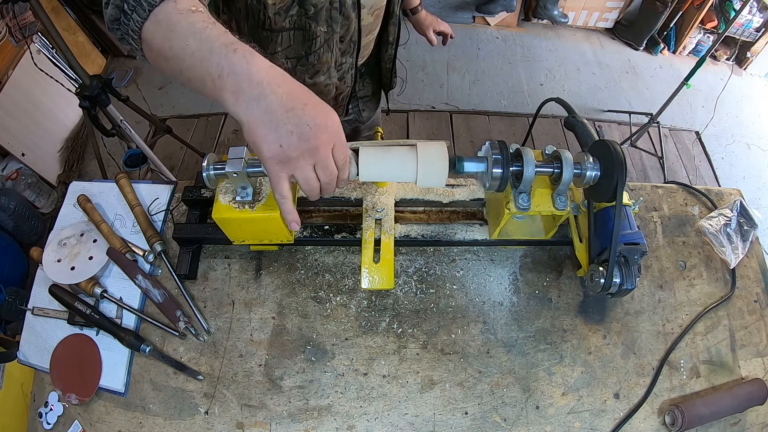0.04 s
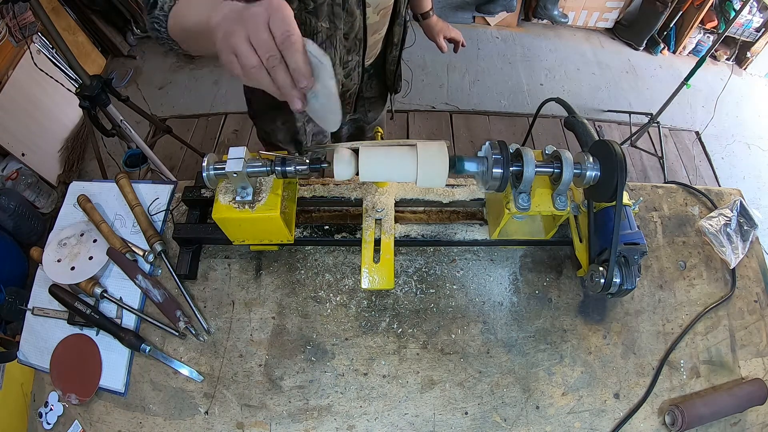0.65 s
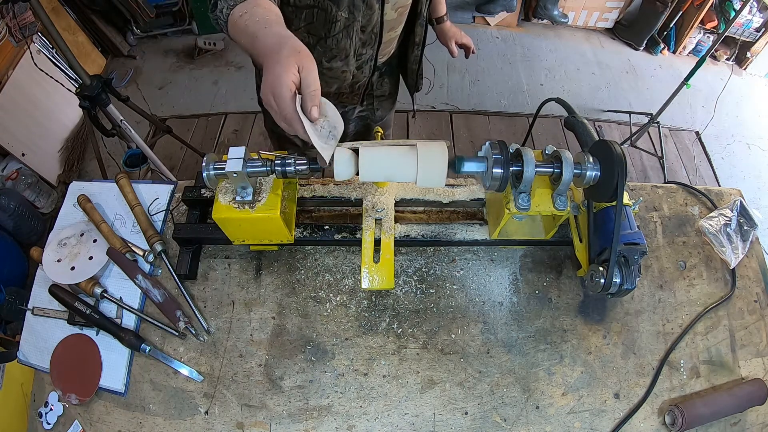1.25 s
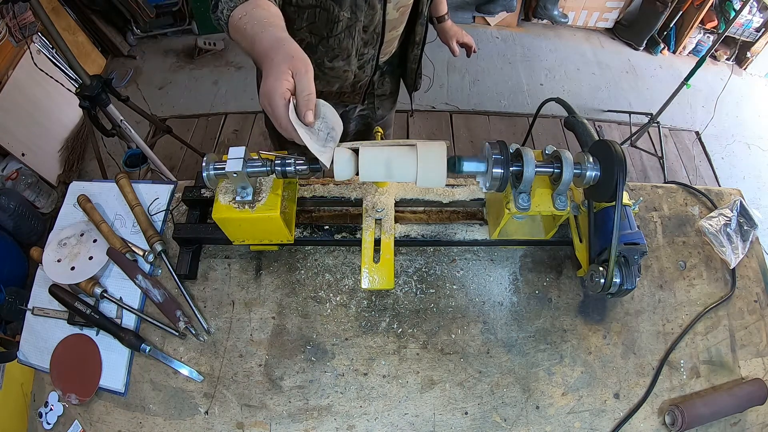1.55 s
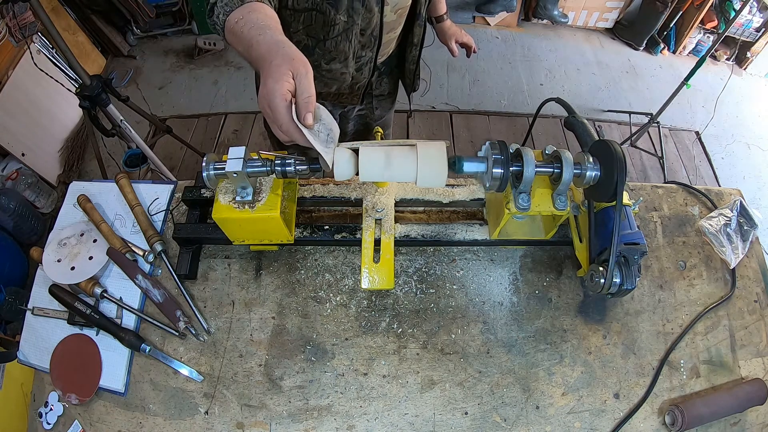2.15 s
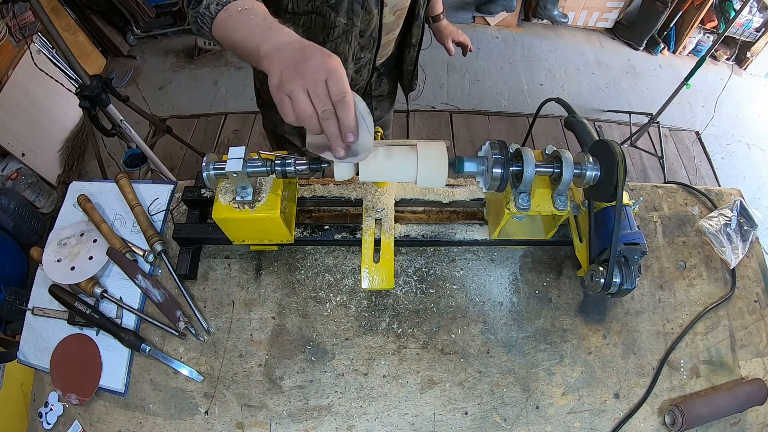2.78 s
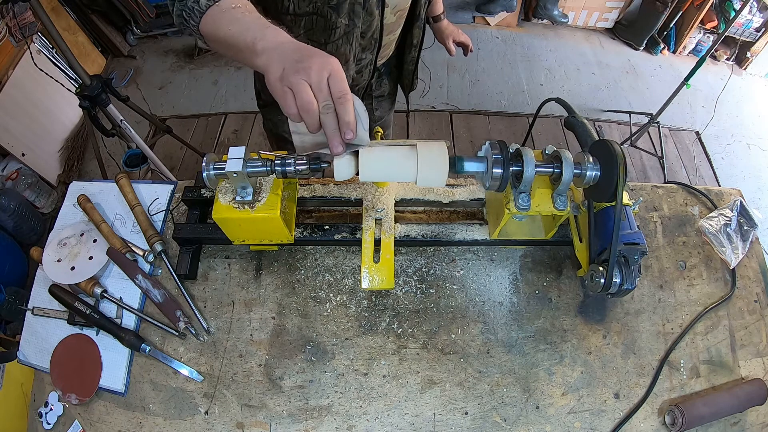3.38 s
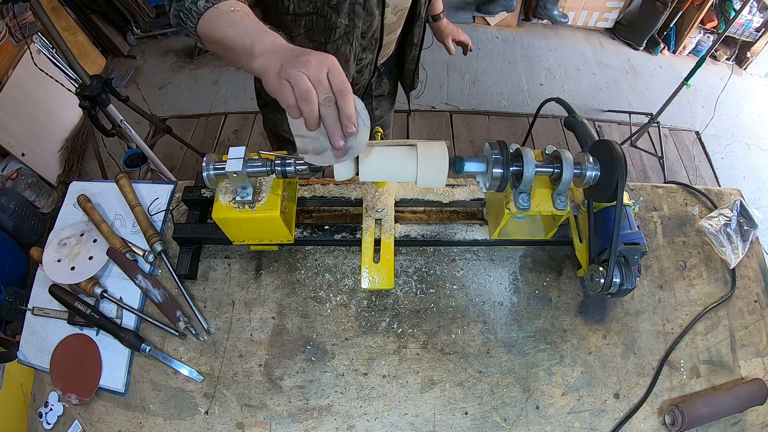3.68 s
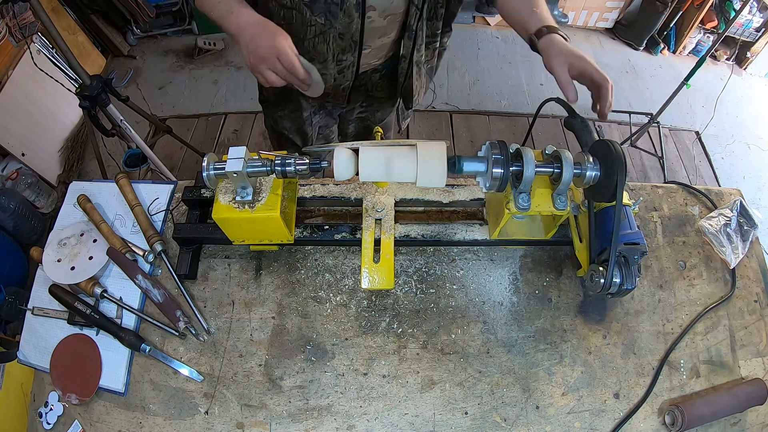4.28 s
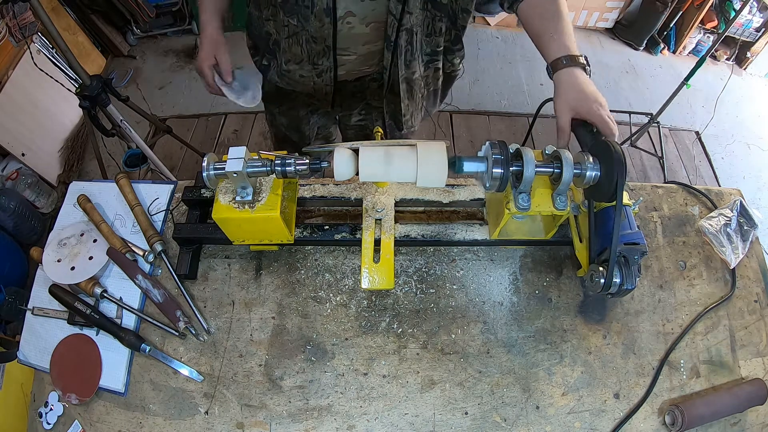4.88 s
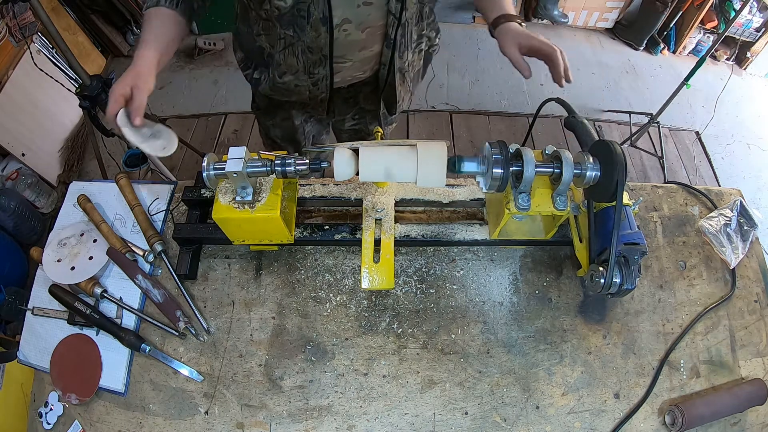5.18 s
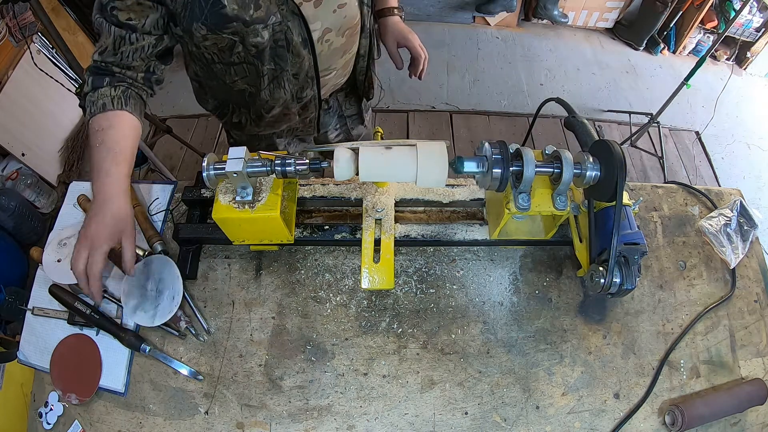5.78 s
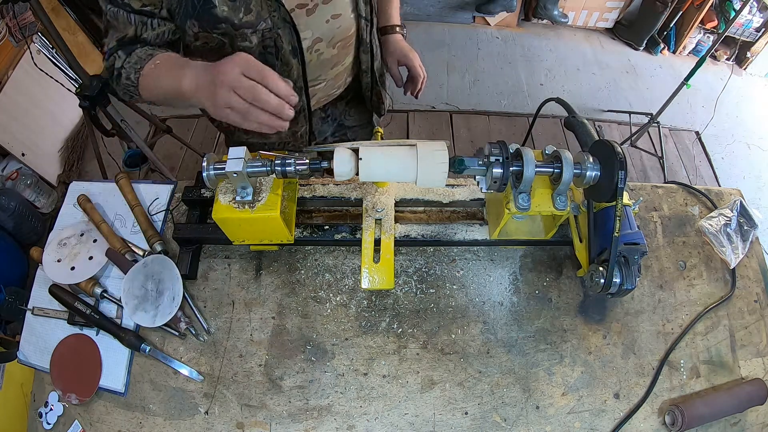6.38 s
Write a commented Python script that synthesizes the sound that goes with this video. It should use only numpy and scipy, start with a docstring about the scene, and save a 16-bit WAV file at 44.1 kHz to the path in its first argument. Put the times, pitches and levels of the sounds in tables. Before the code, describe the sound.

A small belt-driven wood lathe runs in a garage workshop, heard from close by. A sanding disc rubs the spinning wood with a dry, rapidly pulsing hiss and a high metallic ring over a low motor hum. After nearly five seconds the power cuts: the hum ends, the tones slide down and the hiss fades as the spindle slows. One soft knock on the bench follows the stop.

```python
"""A small belt-driven wood lathe runs on a garage workbench, a sanding disc held at the spinning piece.
Dry rubbing and rolling hiss and ring the spindle steel in pulses tied to the rotation; the bed drones
and the motor hums. The power is switched off: the hum ends, the tones slide down and the hiss fades
as friction brakes the spindle. A low rumble comes up, and just after standstill there is one soft
knock on the bench."""
import sys
import numpy as np
from scipy import signal
from scipy.fft import rfft, irfft, next_fast_len
from scipy.io import wavfile
from scipy.ndimage import uniform_filter1d

SR = 44100
rng = np.random.default_rng(int(sys.argv[2]) if len(sys.argv) > 2 else 0)


def put_to_file(sound):
    """Save the sound as 16-bit audio at rate SR, in the file named by the first command-line argument."""
    columns = np.atleast_2d(sound).T  # one column per channel
    safe = np.clip(columns, -1, 1)
    whole_steps = np.round(safe * 32767)
    wavfile.write(sys.argv[1], SR, whole_steps.astype(np.int16))


N = 288414
TIME = np.arange(N) / SR
TURN_HZ, HUM_HZ, POWER_OFF_S = 18.22, 100, 4.78

# drive under power: (time [s], speed [share of full speed])
DRIVEN_SPEED = [(0, .984), (.45, .984), (.8, 1.0), (1.4, 1.005), (2.3, .977), (3.3, 1.001), (4.2, 1.002),
                (4.4, 1.009)]
# spindle play, seated while the disc presses on the piece: (time [s], slack [0 seated, 1 loose])
SPINDLE_SLACK = [(0, 0.51), (.45, 0.27), (.65, 0.78), (.95, .03), (4.05, 0.045), (4.45, 1)]
# rough spots: (frequency [multiple of turn rate], relative depth when fast [dB], when slow [dB])
ROUGH_SPOTS = [(1, 1.1, .3), (2, 1.4, .9), (3.71, 2.0, 2.4), (7.42, .1, 3.1), (8, 1.5, .3)]
# modes of the spindle steel (two groups), the lathe bed and the bearing housings:
# (frequency [Hz], bandwidth [Hz], relative level [dB], change when loose [dB], change when slow [dB])
STEEL_LOW_MODES = [(4077, 100, -15.5, -9.5, 18), (4442, 160, -6, -1, -11), (4463, 100, -21, 13.5, -6),
                   (4664, 60, -6, 2.5, 3), (4710, 23, 0.5, -4, -10), (4948, 138, -3.5, -2.5, -2),
                   (5130, 40, -23.5, 11, 13), (5290, 160, -16, 1, 9), (5500, 57, -0.5, 2.5, -16),
                   (5696, 65, -0.5, -8, 10), (5880, 101, 0.5, -2, 6), (5946, 30, 6, -0.5, 2)]
STEEL_HIGH_MODES = [(6100, 56, 5, 9.5, -1), (6310, 140, 3, 16.5, 1.5), (6363, 110, 9, -30, 4),
                    (6475, 74, 12.5, 9.5, -15), (6706, 140, 0.5, 22, -4), (6540, 80, -33, 9.5, -0.5),
                    (7030, 290, -0.5, 13, -5), (6840, 60, -38.5, -12, -2)]
BED_MODES = [(224.3, 14.5, -11, -1.5, 0.5), (241.6, 4.7, -3, -5, -9.5), (282.7, 9.5, -0.5, -2, -1.5),
             (309.4, 16.3, -2, 0.5, -1.5), (329.6, 23, -9.5, 5.5, -1), (342.3, 16, -1.5, -2.5, -5.5),
             (365.2, 14.7, -10, 1, 4), (478.7, 8.2, -7, 0.5, -2.5), (508.2, 12.5, -7.5, -3.5, 5)]
HOUSING_MODES = [(604, 23, -8, 6.5, -2.5), (739, 56, -16.5, 4, 7.5), (926, 33.6, -1, -5, 1),
                 (988, 16, -6, 8, -7.5), (1256, 150, -9, 2, 1), (1568, 120, -5, -2, 4),
                 (1820, 55, -7.5, -9, 23), (1854, 24, 6.5, -3.5, -4), (1997, 89, 1, 0, 0.5),
                 (2460, 130, -2.5, 2.5, -4), (2673, 22, 3.5, 2.5, -10), (2870, 44, 0.5, -4, 5),
                 (3144, 230, -6, -10.5, 3.5), (3460, 147, 0, 2.5, -13), (4040, 290, -13, 9.5, -9)]
# gain of each part:
# (seated gain [dB], change when loose [dB], knee [share of full speed], fade [dB per tenfold slowing])
HISS_GAIN = (-32, 1.24, 0.64, 25)
STEEL_LOW_GAIN = (-22, -5, 0.77, 22)
STEEL_HIGH_GAIN = (-27.5, 0.44, .5, 22)
BED_GAIN = (-44.5, 2, 0.48, 16.5)
HOUSING_GAIN = (-42, 1, 0.15, 21.5)
# spectra of the friction hiss and the still workshop: (frequency [Hz], relative spectral level [dB])
HISS_SPECTRUM = [(60, -18), (150, -13), (400, -9), (800, -8), (2000, -7), (3200, -2), (4500, 2), (7000, 4),
                 (8400, 1.5), (9400, -3), (10300, -11), (11600, -16), (13000, -22), (16000, -26)]
AIR_SPECTRUM = [(15, -30), (25, -28.5), (70, 0.5), (97, -9), (161, -16.5), (545, -22.5), (624, -20),
                (2110, -36), (5280, -26), (16000, -39)]
# bearing whirr: (frequency [multiple of turn rate], half-width [Hz], level when loose and fast [dB])
WHIRR_BANDS = [(130, 130, -50), (144, 16, -52), (462, 300, -48), (632, 300, -59)]
# unbalance and belt tones: (frequency [multiple of turn rate], relative level [dB])
DRIVE_HARMONICS = [(4, -51), (5, -56), (6, -61), (7, -61), (8, -51), (16, -54)]
# bench-top resonances that the drive shakes: (frequency [Hz], bandwidth per pass [Hz], gain [dB])
BENCH_TOP_MODES = [(110, 30, 0), (287, 20, 4)]
# motor whine: (frequency [multiple of turn rate], seated level [dB], change when loose [dB])
WHINE_PARTIALS = [(144, -54, 6), (288, -45, -1)]
# blow on the bench: (time [s], relative level [dB])
BLOWS = [(6.398, -45)]
# modes of the struck bench: (frequency [Hz], relative level [dB], 60 dB decay time [s])
STRUCK_BENCH_MODES = [(125, 1.5, 0.072), (216, 3, 0.073), (352, -6, 0.065), (530, -18, .06),
                      (900, -16, .05), (1495, -22, .04)]


def from_db(db):
    """Amplitude ratio of a level in decibels."""
    return 10 ** (np.asarray(db) / 20)


def unit_rms(x):
    """Normalisation to an rms of 1."""
    return x / np.sqrt(np.mean(x ** 2) + 1e-20)


def at_samples(curve):
    """Linear interpolation of a (time, value) curve at every sample."""
    return np.interp(TIME, *np.transpose(curve))


def drift(rate_hz):
    """Random fluctuation: noise low-passed at rate_hz, with an rms near 1."""
    step, settle = 40, 2000   # computed at every 40th sample; the filter's onset is dropped
    pole = np.exp(-2 * np.pi * rate_hz * step / SR)
    noise = rng.standard_normal(N // step + settle + 2)
    smooth = signal.lfilter([1], [1, -2 * pole, pole * pole], noise)[settle:]
    return np.interp(np.arange(N) / step, np.arange(len(smooth)), unit_rms(smooth))


def resonate(x, hz, width_hz):
    """Forced response of a damped oscillator with unit peak gain."""
    radius = np.exp(-np.pi * width_hz / SR)
    feedback = [1, -2 * radius * np.cos(2 * np.pi * hz / SR), radius ** 2]
    return signal.lfilter(np.array([1, 0, -1]) * (1 - radius ** 2) / 2, feedback, x)


def band(x, low_hz, high_hz):
    """Band-pass filtering."""
    return signal.sosfilt(signal.butter(3, [low_hz, high_hz], "band", fs=SR, output="sos"), x)


def coloured_noise(spectrum):
    """Spectral shaping of white noise, to an rms of 1."""
    hz, db = np.transpose(spectrum)
    size = next_fast_len(N)
    bin_hz = np.maximum(np.fft.rfftfreq(size, 1 / SR), 1)
    gain = from_db(np.interp(np.log(bin_hz), np.log(hz), db))
    return unit_rms(irfft(rfft(rng.standard_normal(size)) * gain, size)[:N])


def lathe_speed(coast_s=1.583, curve=1.08):
    """Dry friction exerts a nearly constant torque, so after switch-off the speed falls almost evenly."""
    remaining = np.clip(1 - (TIME - POWER_OFF_S) / coast_s, 0, 1)
    return at_samples(DRIVEN_SPEED) * remaining ** curve


def contact_force(turns, speed, slack, slow, powered):
    """Sawtooth modulation: rough spots bite at once and let go slowly, harder when loose and fast."""
    pulsing_db = 0
    for multiple, fast_db, slow_db in ROUGH_SPOTS:
        phase = (multiple * turns + 0.052 * drift(2.5) + rng.random()) % 1
        depth_db = fast_db + (slow_db - fast_db) * slow
        pulsing_db += depth_db * (1 - 2 * phase)
    bite = (1 + .6 * slack) * np.clip(speed / .33, 0, 1) ** 1.5
    buzz_db = -0.7 * powered * np.cos(2 * np.pi * HUM_HZ * TIME)
    roughness_db = drift(270) + 0.5 * drift(28)
    force = from_db(bite * uniform_filter1d(pulsing_db, size=80) + buzz_db + roughness_db)
    return force / np.sqrt(uniform_filter1d(force ** 2, SR // 7))


def part_gain(law, speed, slack):
    """Power-law fade: a part's gain shifts with play, holds at speed and falls below a knee."""
    seated_db, loose_db, knee, fade_db = law
    fade = np.sqrt(1 + from_db(2 * fade_db * np.log10(knee / (speed + 1e-6))))
    return from_db(seated_db + loose_db * slack) / fade


def swell(speed, slack, centre_hz, depth_db, ripples_per_turn=72):
    """Resonance: a group of modes swells as a low overtone of a loose bearing's ripple slides through."""
    overtone = centre_hz / (ripples_per_turn * TURN_HZ * speed + 1e-6)
    strength = slack / (1 + (overtone / 7) ** 4)
    return from_db(depth_db * strength * np.cos(2 * np.pi * overtone))


def ring(modes, slack, slow):
    """Random excitation: tiny contacts ring modes whose balance follows play and speed; rms near 1."""
    total = 0
    for hz, width, db, loose_db, slow_db in modes:
        pass_width = width / np.sqrt(np.sqrt(2) - 1)   # two passes together have the listed bandwidth
        mode = resonate(resonate(rng.standard_normal(N), hz, pass_width), hz, pass_width)
        total += from_db(db + loose_db * slack + slow_db * slow) * mode
    return total / np.sqrt(uniform_filter1d(total ** 2, SR // 4) + 1e-12)


def spindle(speed, slack, slow):
    """Friction noise hisses and excites the steel; the upper modes gain when the spindle runs loose."""
    low = part_gain(STEEL_LOW_GAIN, speed, slack) * swell(speed, slack, centre_hz=4850, depth_db=1)
    high = part_gain(STEEL_HIGH_GAIN, speed, slack) * swell(speed, slack, centre_hz=6630, depth_db=2.5)
    steel = low * ring(STEEL_LOW_MODES, slack, slow) + high * ring(STEEL_HIGH_MODES, slack, slow)
    return steel + part_gain(HISS_GAIN, speed, slack) * coloured_noise(HISS_SPECTRUM)


def frame(force, speed, slack, slow):
    """Structure-borne sound: the heavy bed and the housings follow the contact pulses only partly."""
    bed_gain = part_gain(BED_GAIN, speed, slack) * swell(speed, slack, centre_hz=310, depth_db=0.5)
    bed = bed_gain * force ** 0.17 * ring(BED_MODES, slack, slow)
    housings = part_gain(HOUSING_GAIN, speed, slack) * force ** 0.4 * ring(HOUSING_MODES, slack, slow)
    return bed + housings


def bearing_whirr(turns, speed, slack):
    """Narrow-band noise: loose bearings sing in rough bands that sink and soon fade with the speed."""
    bands = 0
    for multiple, width, db in WHIRR_BANDS:
        phase = 2 * np.pi * multiple * turns
        bands += from_db(db) * (drift(width) * np.cos(phase) + drift(width) * np.sin(phase))
    return bands * slack * speed ** 4


def drive_tones(turns, speed, powered):
    """Forced vibration: unbalance tones swell at the bench resonances; the unpulled belt shudders."""
    angle = 2 * np.pi * turns + .05 * drift(4.1)   # the belt runs a little unevenly
    tones = np.sqrt(2) * sum(from_db(db + 2.2 * drift(2.3)) * np.sin(multiple * angle)
                             for multiple, db in DRIVE_HARMONICS)
    coasting = (1 - powered) * speed
    shudder = from_db(-47) * np.sqrt(coasting) * unit_rms(band(rng.standard_normal(N), 50, 125))
    shake = tones * from_db(6 * coasting) + shudder
    return sum(from_db(db) * resonate(resonate(shake, hz, width), hz, width)
               for hz, width, db in BENCH_TOP_MODES)


def motor(turns, slack, powered):
    """Magnetic forces hum at twice the mains frequency; a whine follows the speed. Both need power."""
    hum = from_db(-53.5 + drift(2)) * np.sin(2 * np.pi * HUM_HZ * TIME)
    whine = sum(from_db(db + loose_db * slack + 2 * drift(7.7)) * np.sin(2 * np.pi * multiple * turns)
                for multiple, db, loose_db in WHINE_PARTIALS)
    return np.sqrt(2) * powered * (hum + whine)


def workshop_air():
    """Ambient noise: a quiet background, and a low rumble that comes up as the lathe stops."""
    rumble = unit_rms(band(rng.standard_normal(N), 53, 67))
    rise = np.interp(TIME, [4.6, 6.1, 6.27, 6.54], [.2, .6, 1.2, .7])
    return from_db(-65) * coloured_noise(AIR_SPECTRUM) + from_db(-61) * rise * rumble


def bench_knock(contact_s=0.019):
    """Impact excitation: a soft, scuffing blow sets the damped modes of the bench ringing."""
    blow = 0
    for start_s, db in BLOWS:
        age = np.maximum(TIME - start_s, 0) / contact_s
        blow += from_db(db - 4) * 2 * age * np.exp(1 - 2 * age)
    scuff = band(blow * rng.standard_normal(N), 80, 1400)
    return sum(from_db(db + 14) * resonate(scuff, hz, np.log(1000) / (np.pi * t60))
               for hz, db, t60 in STRUCK_BENCH_MODES)


def garage(x, t60_s=.16, wet_db=-11):
    """Reverberation: dense reflections from bench and walls decay exponentially after the direct sound."""
    t = TIME[:SR // 3]
    tail = rng.standard_normal(len(t)) * from_db(-60 * t / t60_s) * (t > .002)
    wet = signal.fftconvolve(x, tail / np.sqrt(np.sum(tail ** 2)))[:N]
    return x + from_db(wet_db) * wet


def scene(crawl_speed=0.066):
    """Superposition: rubbing, shaking and tones, all driven by one speed, add to the air and the knock."""
    speed = lathe_speed()
    slack = np.clip(at_samples(SPINDLE_SLACK), 0, 1)
    slow = np.clip(1.6 * (1 - speed), 0, 1)
    turns = TURN_HZ * np.cumsum(speed) / SR
    powered = np.clip((POWER_OFF_S - TIME) / .04, 0, 1)
    force = contact_force(turns, speed, slack, slow, powered)
    scraping = speed ** 2 / np.hypot(speed ** 2, crawl_speed ** 2)   # dies away at a crawl
    contacts = force * spindle(speed, slack, slow) + frame(force, speed, slack, slow)
    in_room = garage(scraping * contacts + bench_knock())
    whirr = bearing_whirr(turns, speed, slack)
    drive = drive_tones(turns, speed, powered) + motor(turns, slack, powered)
    return (in_room + whirr + drive + workshop_air())[None]


def record(dry, ceiling=.212, hardness=24, cutoff_hz=15850):
    """Saturation: the highest peaks overload and crackle faintly; a low-pass cuts the top."""
    saturated = dry / (1 + np.abs(dry / ceiling) ** hardness) ** (1 / hardness)
    return signal.sosfilt(signal.ellip(10, .1, 80, cutoff_hz, fs=SR, output="sos"), saturated)


dry = scene()
out = record(dry)
put_to_file(out)
```